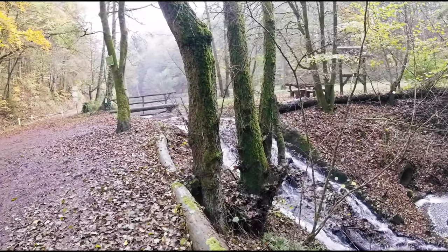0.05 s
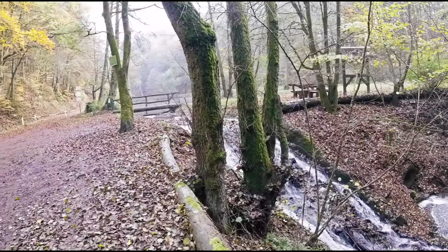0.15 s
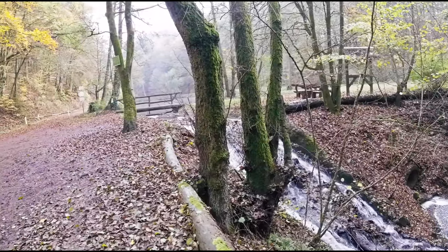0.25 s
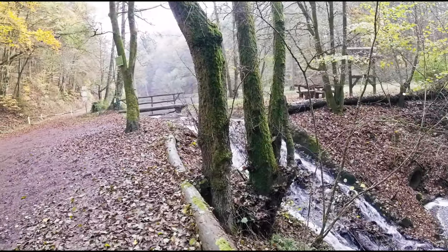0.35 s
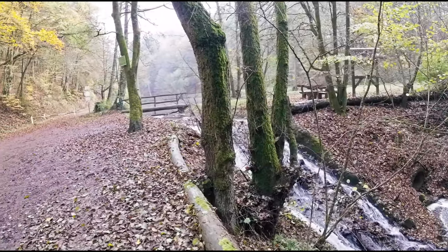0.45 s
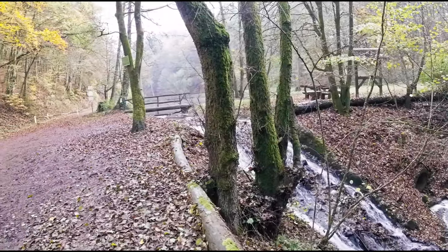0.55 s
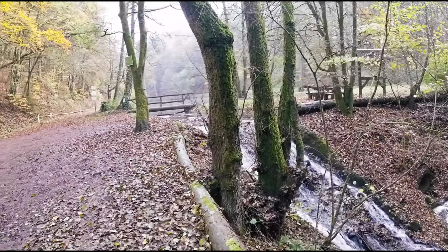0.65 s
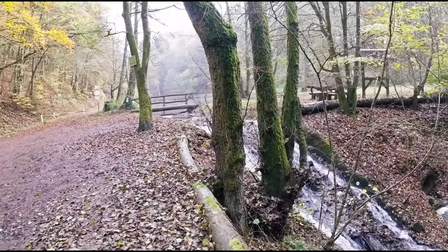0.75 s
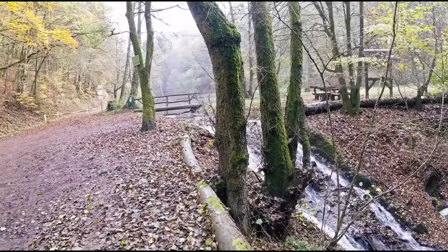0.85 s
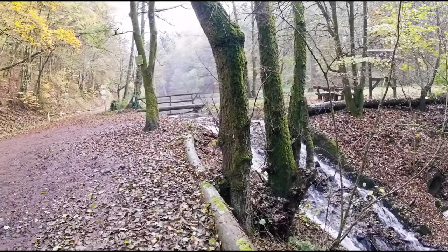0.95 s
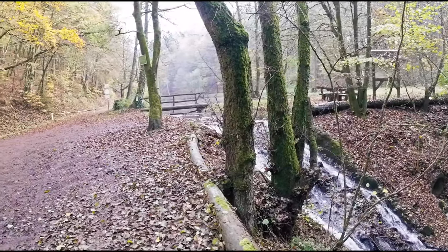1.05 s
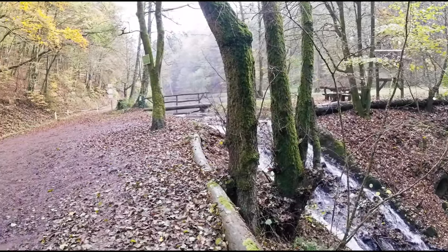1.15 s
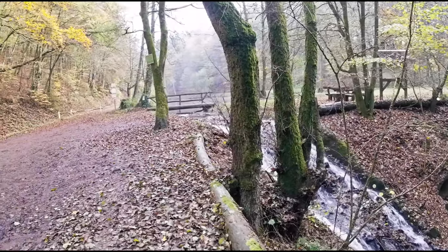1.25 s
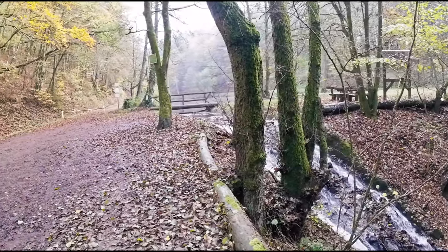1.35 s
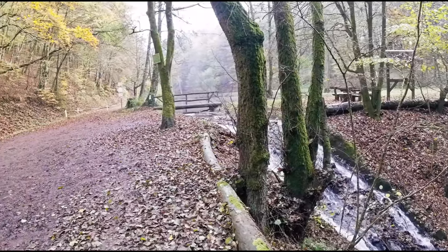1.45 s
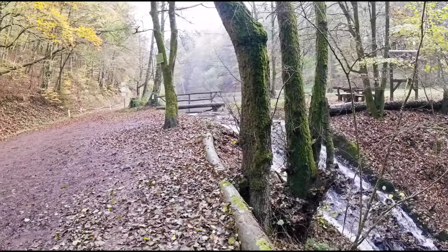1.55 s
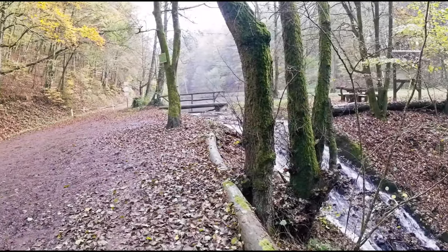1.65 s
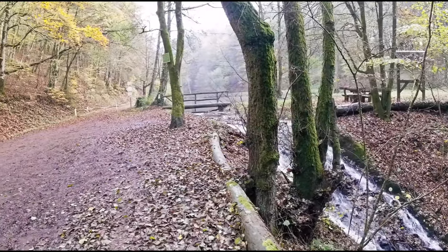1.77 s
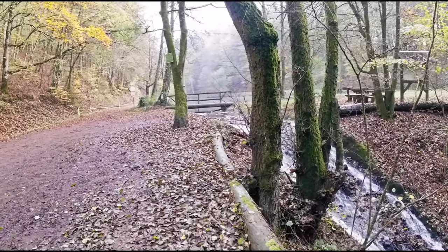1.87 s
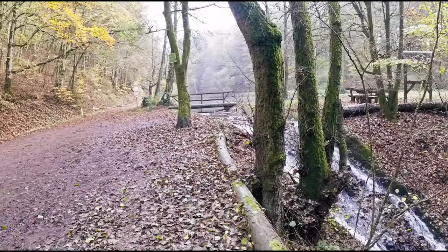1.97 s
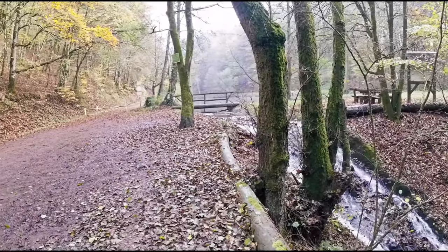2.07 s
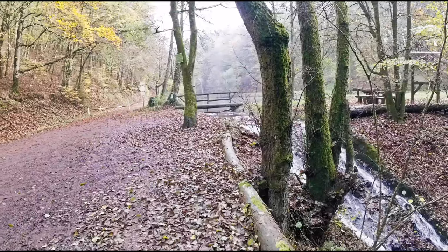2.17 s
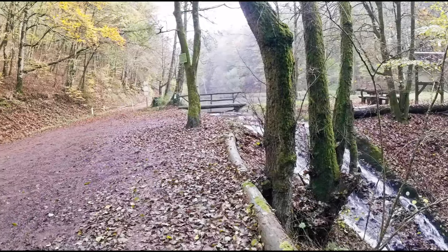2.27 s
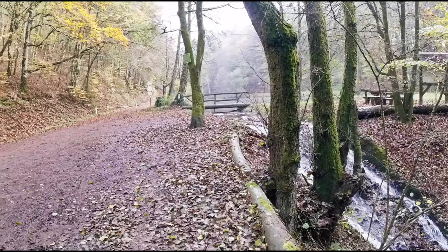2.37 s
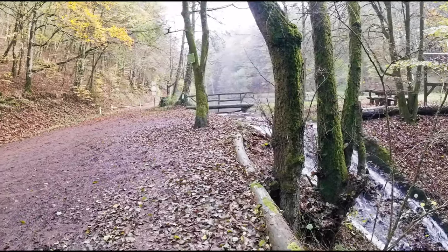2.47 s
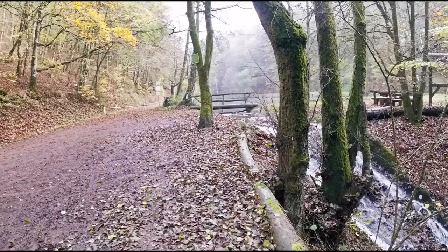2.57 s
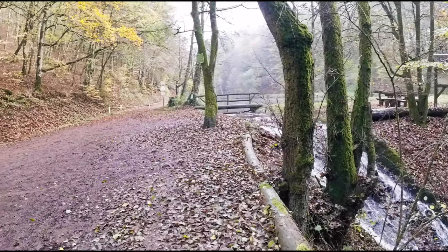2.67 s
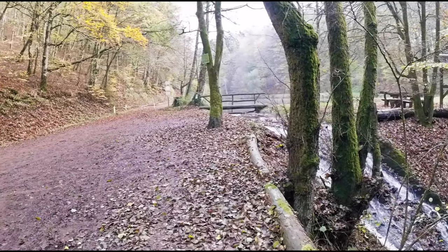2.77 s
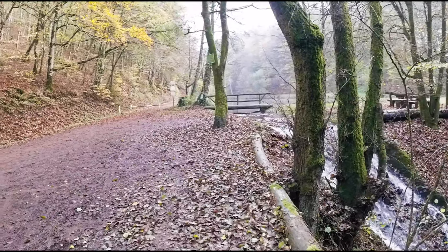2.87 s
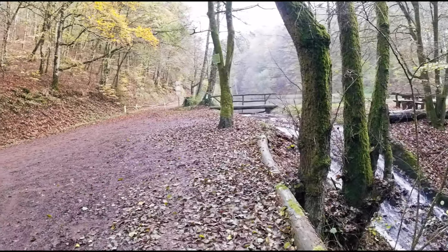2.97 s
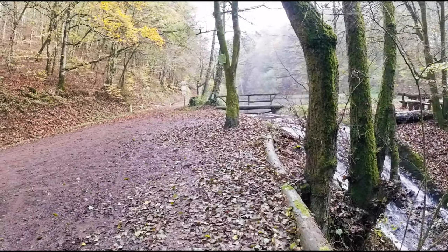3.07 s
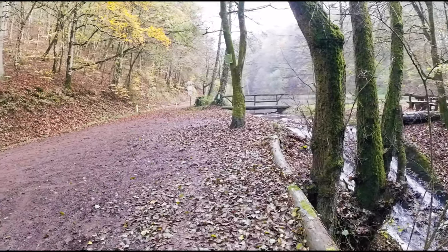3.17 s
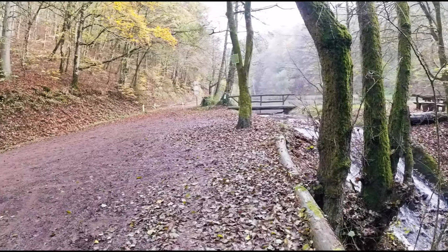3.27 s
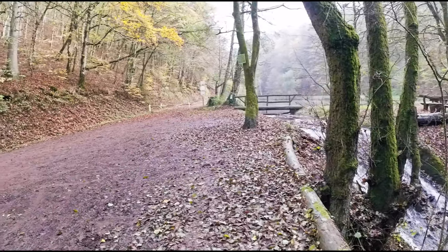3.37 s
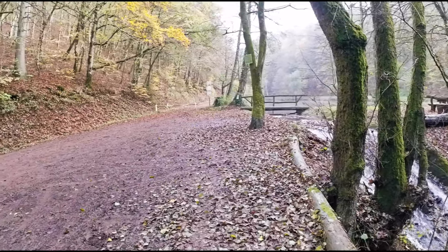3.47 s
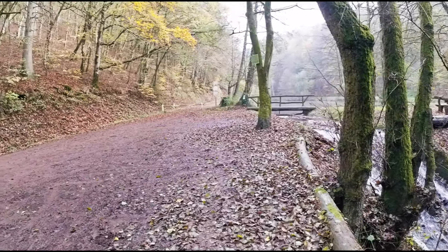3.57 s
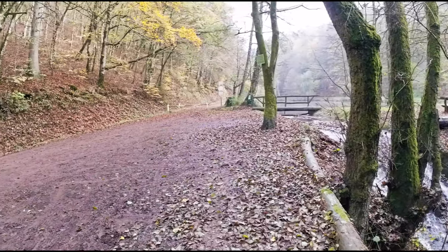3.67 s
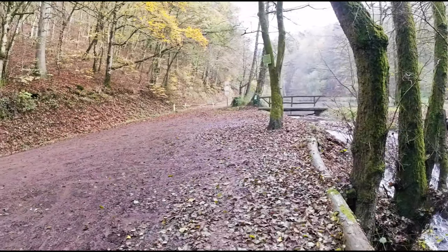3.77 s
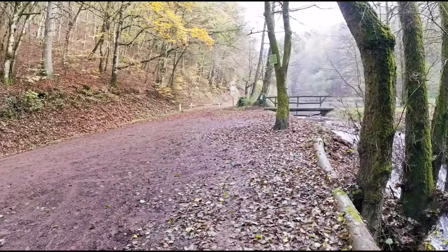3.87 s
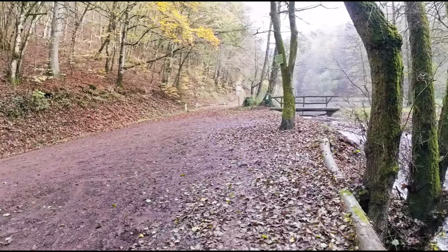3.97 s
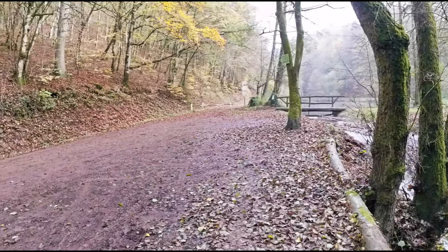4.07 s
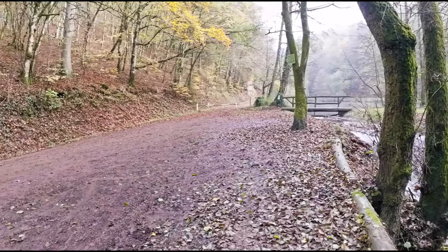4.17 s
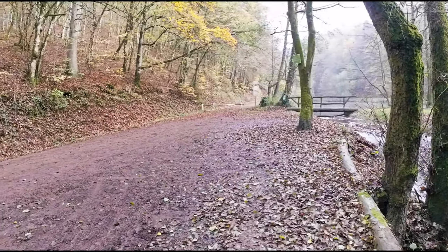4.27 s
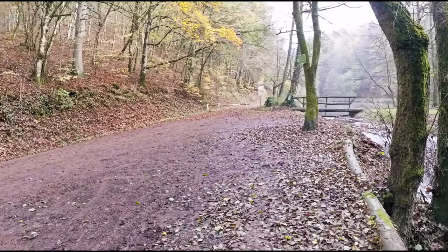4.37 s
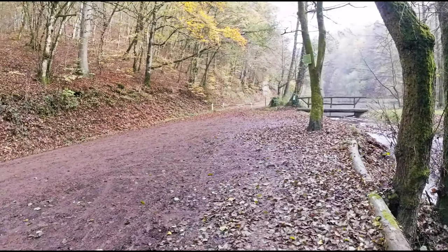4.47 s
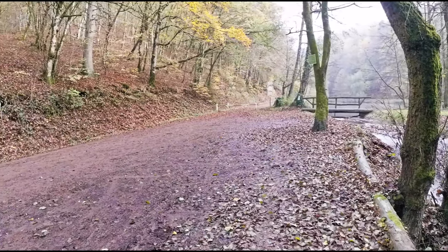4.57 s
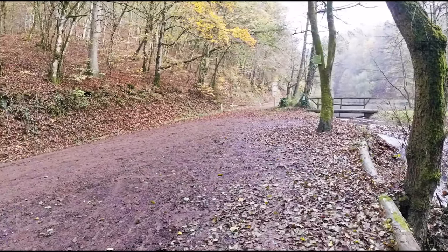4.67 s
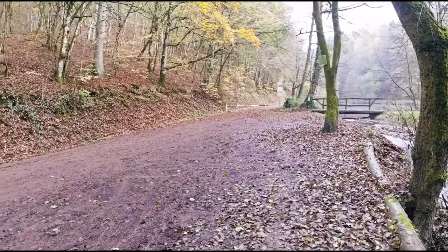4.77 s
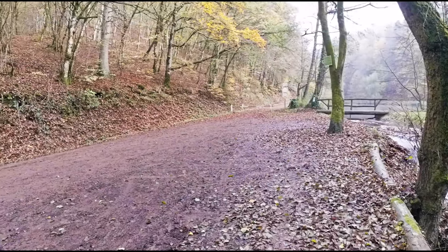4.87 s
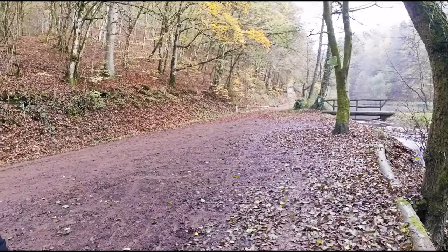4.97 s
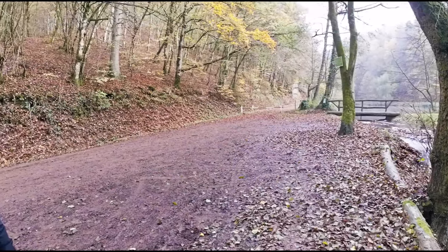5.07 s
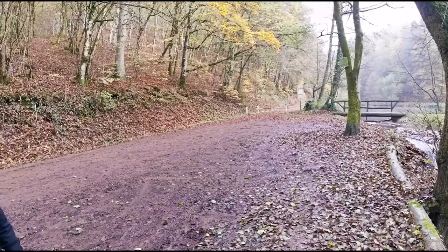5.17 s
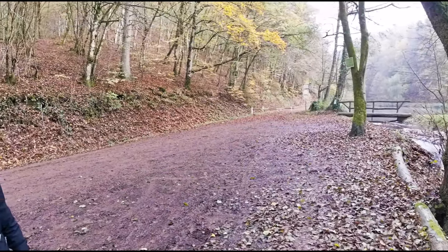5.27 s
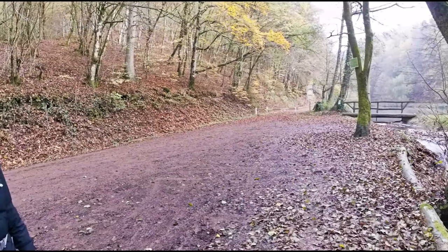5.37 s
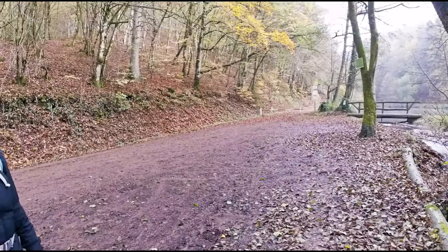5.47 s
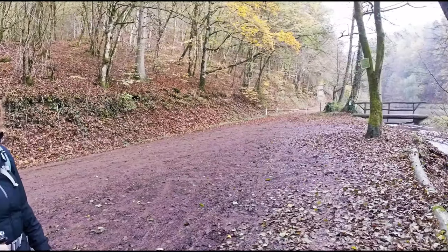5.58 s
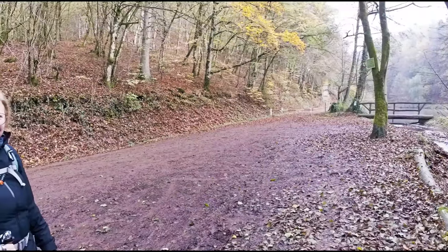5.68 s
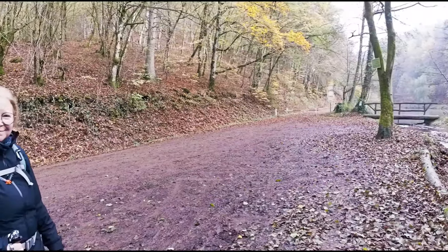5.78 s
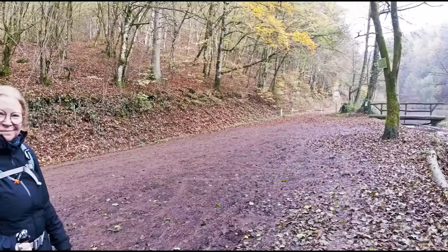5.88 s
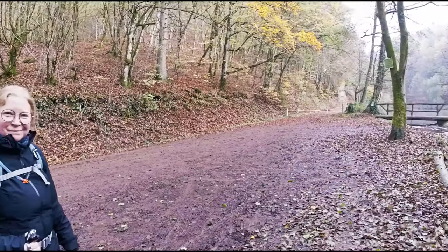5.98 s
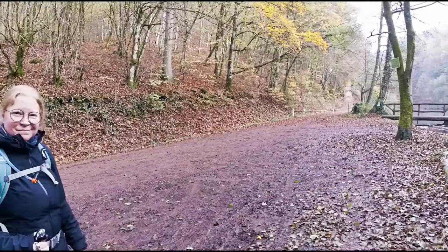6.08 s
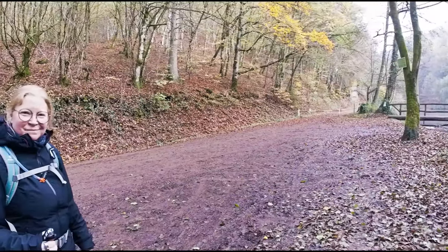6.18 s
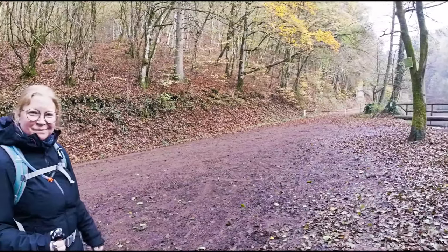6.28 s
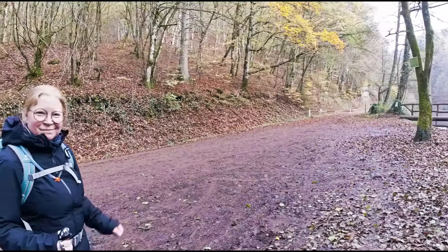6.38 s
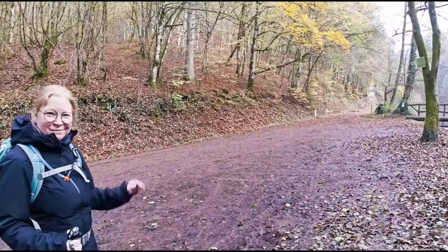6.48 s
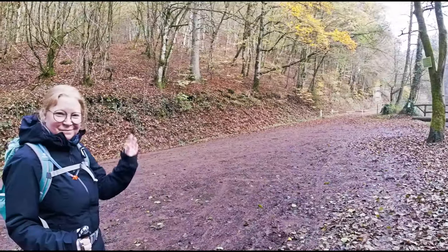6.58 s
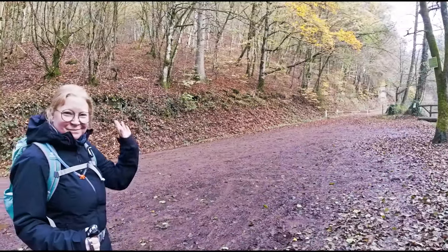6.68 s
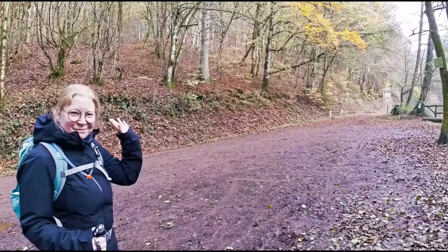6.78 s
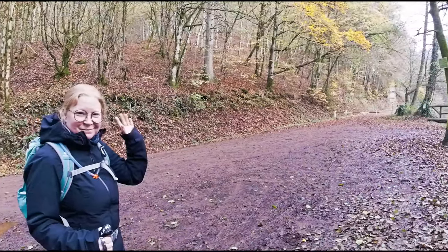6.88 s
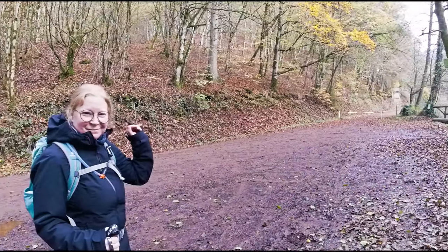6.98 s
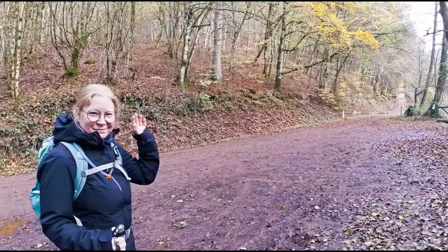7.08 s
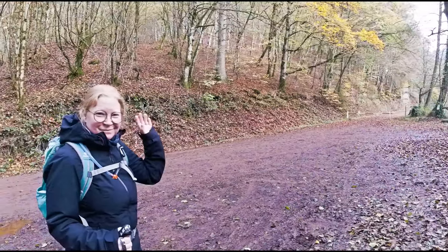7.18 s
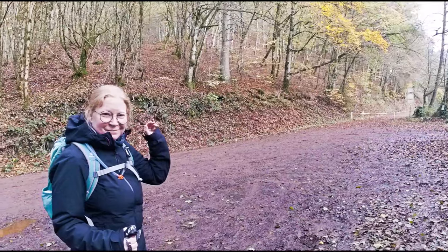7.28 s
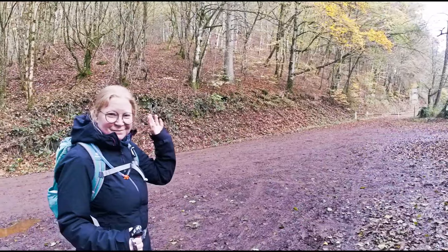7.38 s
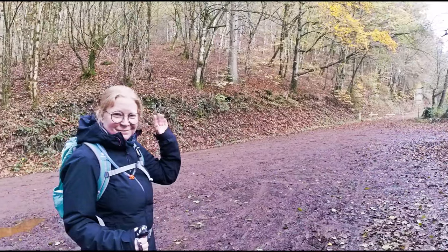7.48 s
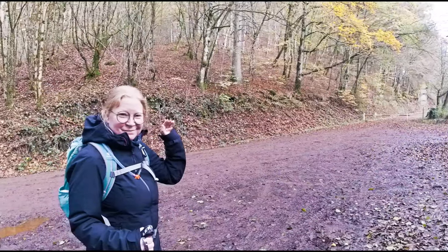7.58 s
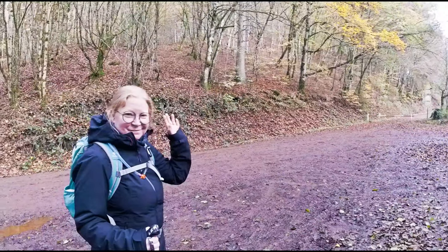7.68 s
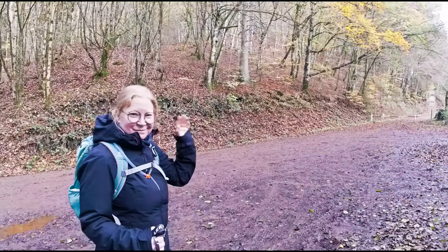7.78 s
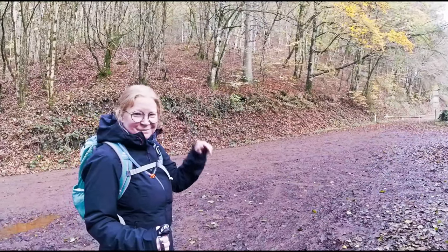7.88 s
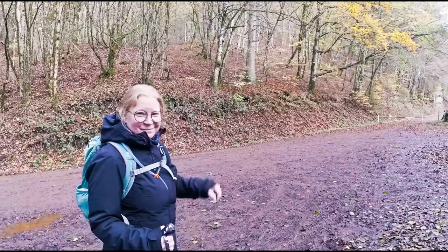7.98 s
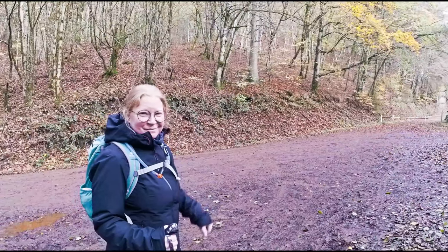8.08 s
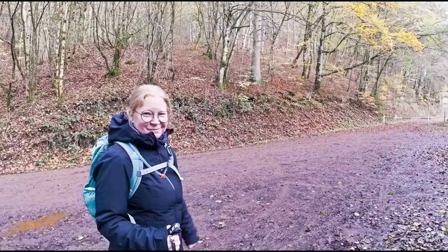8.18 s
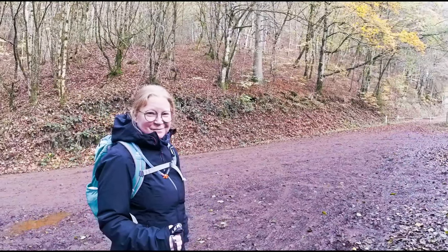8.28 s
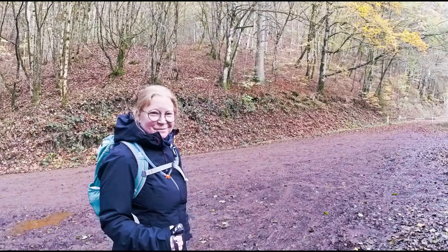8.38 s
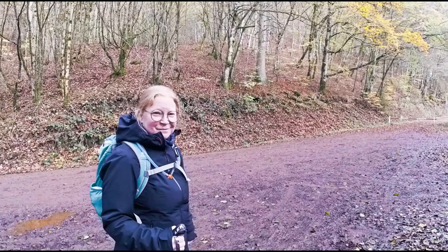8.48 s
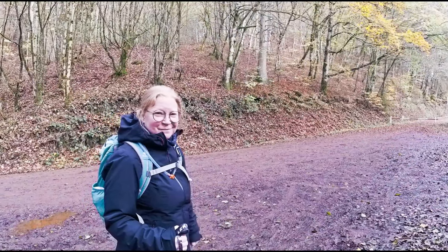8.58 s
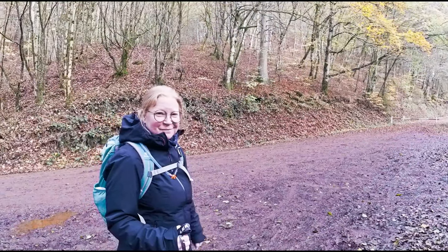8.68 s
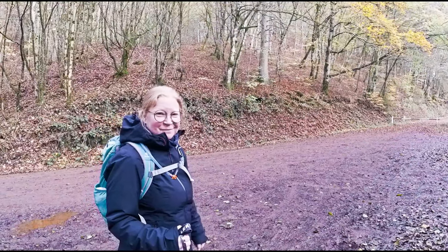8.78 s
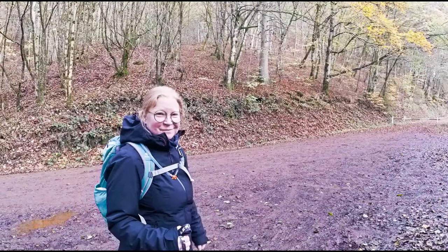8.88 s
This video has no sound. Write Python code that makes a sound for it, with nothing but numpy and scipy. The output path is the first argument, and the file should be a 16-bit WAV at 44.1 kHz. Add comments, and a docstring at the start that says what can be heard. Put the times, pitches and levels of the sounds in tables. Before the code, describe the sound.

A small forest stream rushes steadily down a stepped cascade, gurgling and gulping, slowly growing duller and quieter before fading out.

```python
"""A small forest stream rushes down a stepped cascade in steady flow.
From the start, countless bubbles merge into a rush; single bubbles, spray and booming hollows stand out a little.
Air pockets gulp and gurgle, lumps of water slop down, a cavity rings, and the rush swells now and then.
From 1.6 s to 7.5 s a microphone turns slowly away, which shades the treble and makes the water quieter.
From about 7 s the sound fades, ending just short of silence; both channels are the same."""
import sys
import numpy as np
from scipy import signal
from scipy.fft import rfft, irfft, next_fast_len
from scipy.io import wavfile

SR = 44100
rng = np.random.default_rng(int(sys.argv[2]) if len(sys.argv) > 2 else 0)


def dump(signal):
    """Clip the signal to [-1, 1] and save it as 16-bit WAV at the path in sys.argv[1]."""
    limited = np.clip(np.atleast_2d(signal).T, -1, 1)
    pcm = np.round(limited * 32767).astype(np.int16)
    wavfile.write(sys.argv[1], SR, pcm)


N = 394254
TIME = np.arange(N) / SR
FFT_SIZE = 2 * next_fast_len(N // 2 + 1)
FREQS = np.fft.rfftfreq(FFT_SIZE, 1 / SR)
LOG_FREQS = np.log(FREQS + 1e-9)  # the tiny offset avoids log(0)


def from_db(db):
    """Turn decibels into a gain."""
    return np.exp(np.asarray(db) * (np.log(10) / 20))


def rms_one(x):
    """Scale a sound to an rms of 1."""
    return x / np.sqrt(np.mean(x ** 2) + 1e-20)


def gain_at(points):
    """Gain of a (frequency [Hz], level [dB]) table at every frequency, joined on a log-frequency axis."""
    table = np.array(points)
    return from_db(np.interp(LOG_FREQS, np.log(table[:, 0]), table[:, 1]))


def colour(x, points):
    """Make some frequencies of a sound louder or softer, following a (frequency [Hz], level [dB]) table."""
    return irfft(rfft(x, FFT_SIZE) * gain_at(points))[:N]


def band(x, low_hz, high_hz):
    """Pick out the part of a sound between two frequencies, with sloping edges."""
    return colour(x, [(low_hz / 2 ** .25, -30), (low_hz, 0), (high_hz, 0), (high_hz * 2 ** .5, -30)])


def butter(x, hz, kind, order=2):
    """Butterworth filter: keep one side of a frequency, or the band between two."""
    sections = signal.butter(order, np.clip(hz, 10, .45 * SR), kind, fs=SR, output="sos")
    return signal.sosfilt(sections, x)


def drift(rate):
    """A wandering random curve with rms 1, changing about rate times a second."""
    # Smoothed noise at a twentieth of the sample rate; the filter's first 4000 values are left out.
    r = np.exp(-40 * np.pi * rate / SR)
    noise = rng.standard_normal(N // 20 + 4002)
    slow = signal.lfilter([1], [1, -2 * r, r * r], noise)[4000:]
    return np.interp(np.arange(N) / 20, np.arange(len(slow)), rms_one(slow))


def resonate(x, hz, width_hz):
    """Ring at one pitch, with gain 1 at the top of the resonance; a narrow one rings longer."""
    r = np.exp(-np.pi * width_hz / SR)
    feed = np.array([1, 0, -1]) * (1 - r * r) / 2
    feedback = [1, -2 * r * np.cos(2 * np.pi * hz / SR), r * r]
    return signal.lfilter(feed, feedback, x + 1e-18)


def impacts(per_s, spread_db):
    """Clicks at random moments, many small and a few large."""
    sizes = from_db(spread_db * np.minimum(rng.exponential(1, N), 4))
    return sizes * rng.choice([-1, 1], N) * (rng.random(N) < per_s / SR)


def moments(per_s):
    """Irregular moments: one at a random place in each stretch of 1 / per_s seconds."""
    stretches = np.arange(int(np.ceil(N / SR * per_s)))
    return (stretches + rng.random(N)[stretches]) / per_s


def scatter(mean, spread, count):
    """Chance values around a mean, one for each event."""
    return mean + spread * rng.standard_normal(N)[:count]


def add(out, sound, s):
    """Mix a short sound in, starting at time s."""
    start = int(np.clip(s * SR, 0, N - 1))
    out[start:start + len(sound)] += sound[:N - start]


def pocket(hz, swell_s, phase):
    """An air pocket swells into a soft tone, rises a little in pitch and dies away."""
    t = TIME[:int(6 * swell_s * SR)] - 3 * swell_s  # 0 at the loudest moment
    return np.exp(-(t / swell_s) ** 2) * np.sin(2 * np.pi * (hz * t * (1 + t / 10) + phase))


def play_pockets(pockets, swell_s):
    """Sound a list of pockets, each starting three swell times before its loudest moment."""
    out = np.zeros(N)
    for (s, hz, db), phase in zip(pockets, rng.random(N)):
        add(out, from_db(db) * pocket(hz, swell_s, phase), s - 3 * swell_s)
    return out


# Tone of the merged bubbles, as relative strength:
# (frequency [Hz], level per Hz [dB])
RUSH_TONE = [(25, -46.5), (60, -36), (135, -21), (225, -12.5), (270, -10.5), (305, -5.5), (430, -0.84),
             (570, -1), (630, -0.8), (705, -0.5), (750, 0.3), (800, 2.3), (1100, 0.5), (1900, -2),
             (3000, -2.5), (4100, -3.5), (4800, -7), (5800, -8.5), (9000, -14.5)]


def rush(surge, surge_db, flicker_db, flicker_rate, count=11):
    """Countless bubbles merge into noise; each size class flickers on its own and all share the surge."""
    cloud = rfft(rng.standard_normal(FFT_SIZE)) * gain_at(RUSH_TONE)
    # Bubble size sets pitch, so each class is one slice of frequencies.
    size_class = np.digitize(FREQS, np.geomspace(250, 7500, count - 1))
    out = np.zeros(N)
    for k in range(count):
        slice_sound = irfft(cloud * (size_class == k))[:N]
        out += slice_sound * from_db(flicker_db * drift(flicker_rate))
    return rms_one(out * from_db(surge_db * surge))


def bubble(hz, t60, rise):
    """One bubble: a dying sine that rises in pitch as it nears the surface, down 60 dB after t60 seconds."""
    t = TIME[:int(t60 * SR)]
    return from_db(-60 * t / t60) * np.sin(2 * np.pi * hz * t * (1 + rise * t / t60))


def bubbles(low_hz, high_hz, cycles, rise, spread_db, count=6000):
    """Single bubbles of all sizes; small ones sound higher and last more cycles."""
    out = np.zeros(N)
    for when, size, depth, life, luck in rng.random((count, 5)):
        hz = low_hz * (high_hz / low_hz) ** size
        smallness = np.sqrt(hz / low_hz)
        # Most bubbles are soft; a lucky few are loud.
        loudness = from_db(spread_db * min(-np.log(luck + 1e-9), 4)) * np.sqrt(smallness)
        t60 = cycles * (.5 + life) * smallness / hz
        add(out, loudness * bubble(hz, t60, rise * depth), when * N / SR)
    return rms_one(butter(out, low_hz / 2 ** .5, "high", order=4))


def spray(surge, drops_per_s, clump_db, spread_db, low_hz):
    """Flung drops patter on wet rock as bright clicks, in clumps that follow the surge."""
    drops = impacts(drops_per_s * from_db(clump_db * surge), spread_db)
    return rms_one(butter(drops, low_hz, "high"))


# Hollows under the steps, levels before later shaping:
# (pitch [Hz], width [Hz], level [dB], knocks per second [1/s])
HOLLOWS = [(188, 26, -57.5, 22), (447, 100, -47.5, 80), (758, 16, -47, 90), (800, 50, -46.5, 99),
           (880, 130, -46, 140)]


def pools(spread_db):
    """Falling water drives air under, and its random knocks boom at the pitch of each hollow."""
    out = np.zeros(N)
    for hz, width_hz, db, per_s in HOLLOWS:
        boom = resonate(impacts(per_s, spread_db), hz, width_hz)
        boom = resonate(boom, hz, 4 * width_hz)  # a second, wider pass dulls the sides
        out += from_db(db) * rms_one(boom)
    return out


# Swells, when more water tumbles over the steps:
# (time [s], half length [s], rise above the lull [dB])
WATER_SWELLS = [(1.1, 0.06, 1), (1.95, 0.13, 1), (4.2, 0.14, 1), (4.67, 0.19, 1.4), (5.458, .08, 0.5),
                (6.1, 0.097, 1), (6.952, .14, 0.8), (7.75, 0.3, 0.5)]
LULL_DB = -.5  # between the swells


def swell(water, low_hz, high_hz):
    """The middle of the water sound grows louder while more water tumbles down."""
    swell_db = LULL_DB + sum(db * np.exp(-((TIME - s) / half_s) ** 2) for s, half_s, db in WATER_SWELLS)
    return water + band(water, low_hz, high_hz) * (from_db(swell_db) - 1)


# Moments when the rumble dips briefly: (time [s])
RUMBLE_DIPS = [.26, .49, 1.835, 2.44, 3.44, 6.52]
DIP_DB, DIP_HALF_S = -6.5, 0.027


def heave(water, below_hz, depth_db, rate):
    """The low rumble sinks and rises irregularly, and now and then dips briefly."""
    low = colour(water, [(below_hz, 0), (below_hz * 2 ** .5, -30)])
    dips_db = DIP_DB * sum(np.exp(-((TIME - s) / DIP_HALF_S) ** 2) for s in RUMBLE_DIPS)
    return water + low * (from_db(dips_db + depth_db * drift(rate)) - 1)


def flicker_top(x, from_hz, depth_db, rate):
    """The highest treble flickers quickly in level."""
    top = colour(x, [(from_hz / 2 ** .25, -40), (from_hz, 0)])
    return x + top * (from_db(depth_db * drift(rate)) - 1)


# Air pockets placed by hand, loud and soft, levels before the microphone:
# (loudest time [s], pitch [Hz], peak level [dB])
PLACED_GULPS = [(.07, 193, -45), (.134, 215, -40), (.203, 178, -46), (.54, 188, -44), (.618, 133, -49),
                (.665, 186, -45), (.743, 188, -41), (.85, 188, -47), (1.08, 186, -46), (1.144, 175, -45),
                (1.196, 193, -45.5), (1.562, 192, -46), (1.892, 193, -43), (1.98, 202, -44),
                (2.27, 188, -51), (2.508, 193, -46), (2.68, 188, -51), (2.84, 188, -52), (3.001, 188, -43),
                (3.22, 188, -52), (3.651, 235, -43), (3.669, 176, -42.5), (3.791, 195, -44),
                (3.837, 199, -44), (3.924, 210, -44), (4.017, 188, -42), (4.447, 198, -43),
                (4.569, 185, -40), (4.75, 188, -51), (4.841, 209, -43), (4.946, 184, -41.5),
                (5.06, 188, -49), (5.904, 190, -43), (6.107, 188, -42), (6.19, 188, -49), (6.734, 182, -42),
                (7.361, 195, -40), (7.465, 204, -41), (8.063, 177, -40), (8.464, 197, -42)]
# More pockets come at random.
GULPS_PER_S, GULP_HZ, GULP_SPREAD_OCTAVES, GULP_DB, GULP_SPREAD_DB = 2.5, 188, 0.12, -48.5, 1.5


def gulps(swell_s):
    """Big air pockets boom as low, soft tones in the plunge pool."""
    times = moments(GULPS_PER_S)
    pitches = GULP_HZ * 2 ** scatter(0, GULP_SPREAD_OCTAVES, len(times))
    levels = scatter(GULP_DB, GULP_SPREAD_DB, len(times))
    return play_pockets([*PLACED_GULPS, *zip(times, pitches, levels)], swell_s)


# Clearest gurgles of single large bubbles, levels before the microphone:
# (loudest time [s], pitch [Hz], peak level [dB])
CLEAR_GURGLES = [(.128, 1510, -25), (.23, 399, -35), (.345, 785, -25), (.409, 1410, -26), (.417, 426, -30),
                 (.427, 1302, -26), (.511, 1230, -27), (.639, 624, -31), (.696, 430, -32), (.76, 610, -26),
                 (.845, 470, -28), (.969, 1260, -32), (1.1, 438, -29), (1.106, 645, -26),
                 (1.216, 425, -30.5), (1.366, 425, -33), (1.458, 411, -35), (1.613, 416, -30),
                 (1.937, 440, -31), (2.104, 1510, -30), (2.566, 464, -28.5), (4.023, 585, -28.5),
                 (4.27, 1350, -31.5), (5.164, 583, -27), (6.835, 850, -26), (7.436, 980.4, -30),
                 (7.529, 1162, -28), (7.848, 448, -26), (8.722, 990, -27)]


def gurgles(swell_s):
    """Smaller air pockets break loose and sound as brief tones over the rush."""
    return play_pockets(CLEAR_GURGLES, swell_s)


# Heaviest slops of water on the rocks, levels before the microphone:
# (loudest time [s], level [dB])
HEAVY_SLOPS = [(1.335, -27), (3.347, -27), (4.553, -35), (6.838, -35), (7.438, -33), (8.722, -29)]
# Lighter slops come at random; all are equally brief.
SLOPS_PER_S, SLOP_DB, SLOP_SPREAD_DB, SLOP_HALF_S = 1.5, -39, 1, 0.009


def slops(low_hz, high_hz):
    """A lump of water lands and sheds a brief swarm of middle-sized bubbles, made of filtered clicks."""
    times = moments(SLOPS_PER_S)
    lumps = [*HEAVY_SLOPS, *zip(times, scatter(SLOP_DB, SLOP_SPREAD_DB, len(times)))]
    swarm = rms_one(butter(impacts(5000, 0.93), [low_hz, high_hz], "band", order=3))
    bursts = sum(from_db(db) * np.exp(-((TIME - s) / SLOP_HALF_S) ** 2) for s, db in lumps)
    return swarm * bursts


# A narrow cavity between the rocks rings out, levels before the microphone:
# (loudest time [s], peak level [dB])
CAVITY_RINGS = [(.461, -40), (.649, -38), (.916, -37), (2.076, -33.5), (2.27, -32), (2.35, -39),
                (3.351, -30), (3.551, -34), (4.139, -37), (4.532, -33), (4.648, -34), (5.441, -33)]
CAVITY_HZ = 763  # at the loudest moment


def cavity(swell_s):
    """The flow sets a narrow cavity between the rocks ringing, always around the same pitch, rising slightly."""
    return play_pockets([(s, CAVITY_HZ, db) for s, db in CAVITY_RINGS], swell_s)


# Change in tone with the microphone turned away:
# (frequency [Hz], level [dB])
TURNED_TONE = [(90, 2), (170, -4), (300, 0.5), (520, -1), (760, -0.5), (880, 0.5), (1800, -2.36),
               (3300, -3), (5000, -2.5), (8000, -3.5)]
TURN_START_S, TURN_END_S, TURN_LOSS_DB = 1.6, 7.53, -2.5
# The treble brightens once on the way.
GLINT_S, GLINT_HALF_S, GLINT_LOW_HZ, GLINT_HIGH_HZ, GLINT_DB = 3.7, 0.92, 5170, 7000, 1.6
# A faint, dull reflection from close by; these two times are its delays.
ECHO_FACING_S, ECHO_TURNED_S, ECHO_DB, ECHO_LOW_HZ, ECHO_HIGH_HZ = .0023, 0.0009, -24.5, 250, 1100


def turn_away(water):
    """The microphone's body shades short waves as it turns, and a near reflection's delay shortens."""
    # 0 is facing the stream, 1 is turned away; the pace is even.
    away = np.clip((TIME - TURN_START_S) / (TURN_END_S - TURN_START_S), 0, 1)
    lag_s = ECHO_FACING_S + (ECHO_TURNED_S - ECHO_FACING_S) * away
    echo = np.interp(TIME - lag_s, TIME, band(water, ECHO_LOW_HZ, ECHO_HIGH_HZ))
    glint_db = GLINT_DB * np.exp(-((TIME - GLINT_S) / GLINT_HALF_S) ** 2)
    glint = band(water, GLINT_LOW_HZ, GLINT_HIGH_HZ) * (from_db(glint_db) - 1)
    facing = water + glint + from_db(ECHO_DB) * echo
    blend = (1 - away) * facing + away * colour(facing, TURNED_TONE)
    return from_db(TURN_LOSS_DB * away) * blend


# Levels before the water is shaped further
RUSH_DB, BUBBLES_DB, SPRAY_DB = -25.5, -39.5, -40


def scene():
    """Mix the cascade, with surges shared by rush and spray, and hear it through the turning microphone."""
    surge = drift(22)
    water = from_db(RUSH_DB) * rush(surge, surge_db=0.12, flicker_db=0.5, flicker_rate=16)
    water += from_db(BUBBLES_DB) * bubbles(low_hz=359.5, high_hz=6140, cycles=19.6, rise=0.17, spread_db=3.5)
    water += from_db(SPRAY_DB) * spray(surge, drops_per_s=1200, clump_db=3.5, spread_db=1.5, low_hz=2000)
    water += pools(spread_db=2.0)
    water = swell(water, low_hz=740, high_hz=1260)
    water = heave(water, below_hz=280, depth_db=1.5, rate=11)
    water += gulps(swell_s=0.022)
    water += gurgles(swell_s=0.0065)
    water += slops(low_hz=705, high_hz=1330)
    water += cavity(swell_s=0.043)
    heard = flicker_top(turn_away(water), from_hz=6900, depth_db=1.2, rate=130)
    return np.array([heard, heard])


# Overall treble tone, falling steeply to 9900 Hz, above which the faint hiss rises a little:
# (frequency [Hz], level [dB])
TREBLE_TONE = [(5000, 0), (6100, -1.5), (6900, -7), (7800, -17), (8700, -24.5), (9400, -35.5), (9900, -49),
               (15000, -39.5)]
FADE_START_S, FADE_END_S = 7.01, 9.01
CUTOFF_HZ = 15400


def record(dry):
    """A dull treble, a straight fade-out and a steep top cut."""
    fade = np.clip((FADE_END_S - TIME) / (FADE_END_S - FADE_START_S), 0, 1)
    sound = np.array([colour(channel, TREBLE_TONE) for channel in dry]) * fade
    top_cut = signal.ellip(10, .1, 70, CUTOFF_HZ, fs=SR, output="sos")
    return signal.sosfilt(top_cut, sound)


dry = scene()
out = record(dry)
dump(out)
```